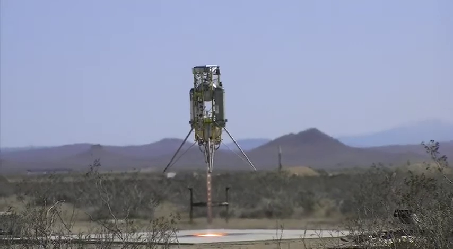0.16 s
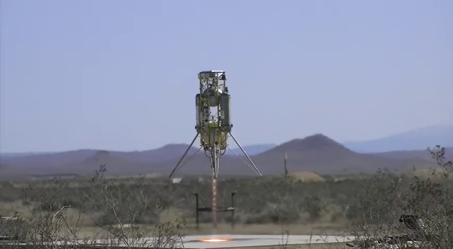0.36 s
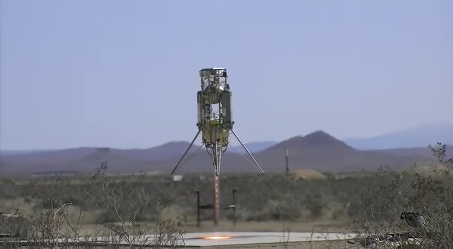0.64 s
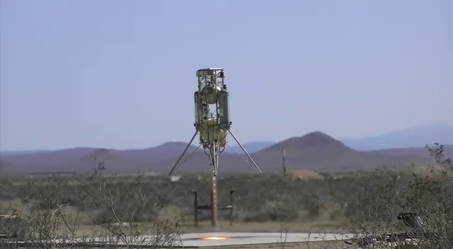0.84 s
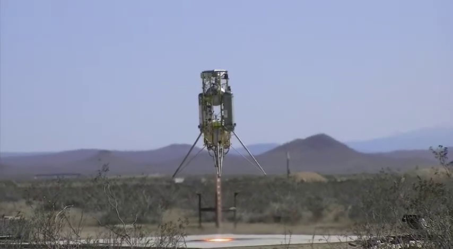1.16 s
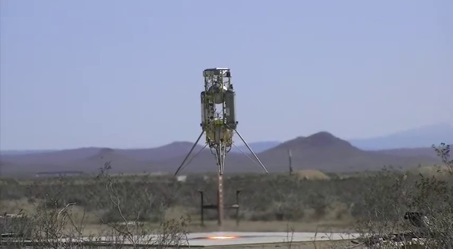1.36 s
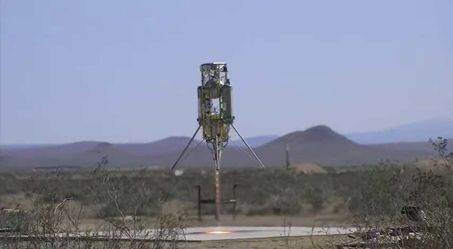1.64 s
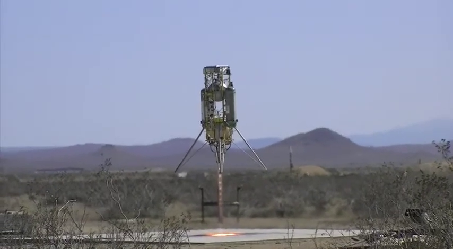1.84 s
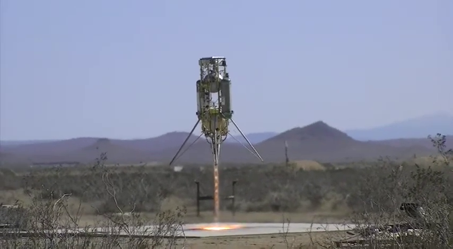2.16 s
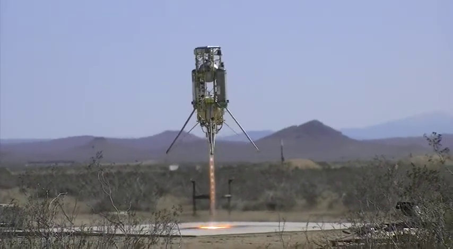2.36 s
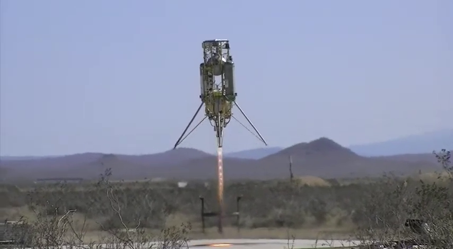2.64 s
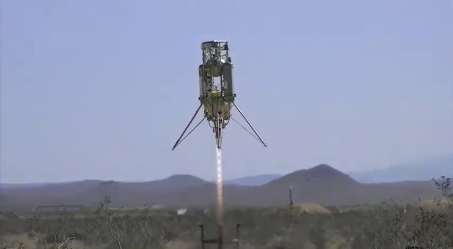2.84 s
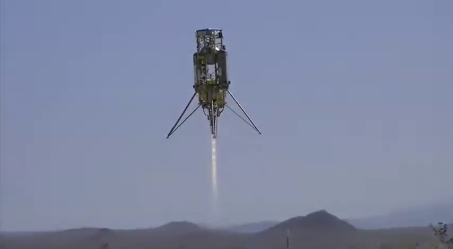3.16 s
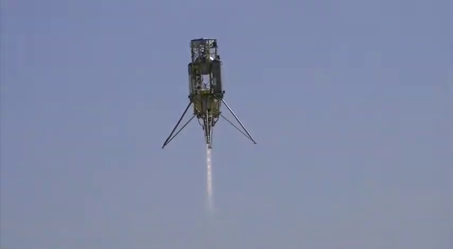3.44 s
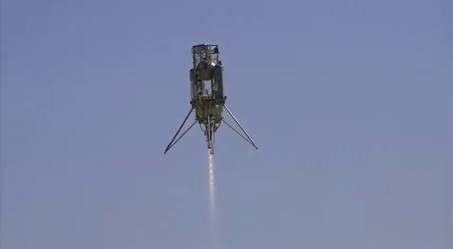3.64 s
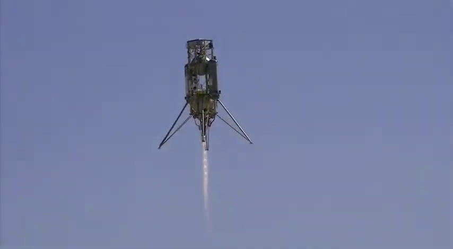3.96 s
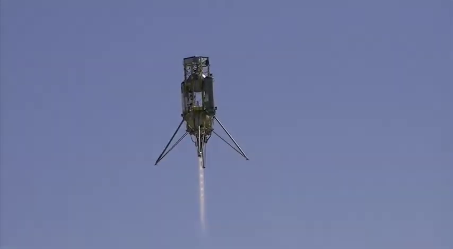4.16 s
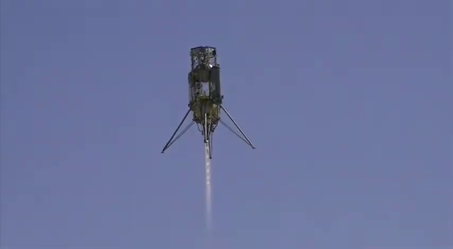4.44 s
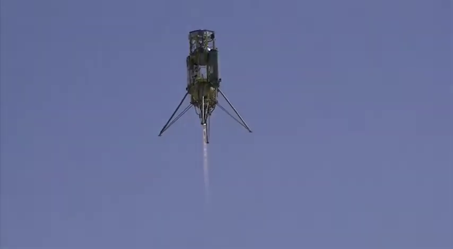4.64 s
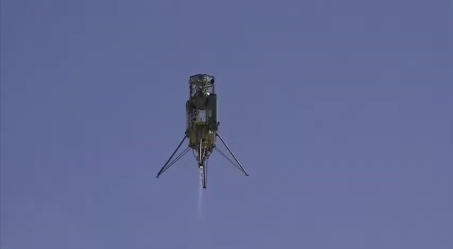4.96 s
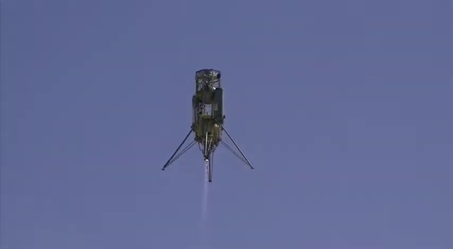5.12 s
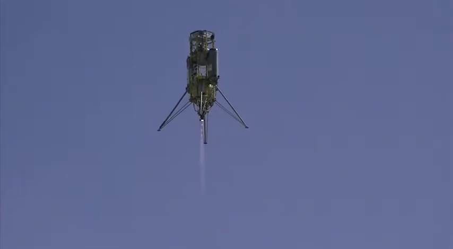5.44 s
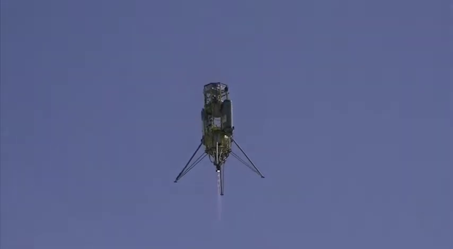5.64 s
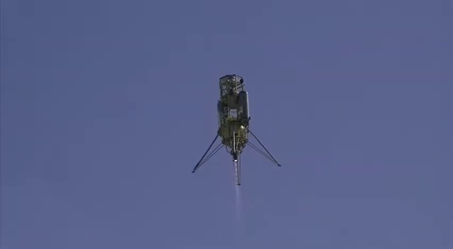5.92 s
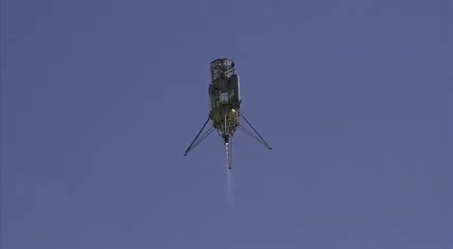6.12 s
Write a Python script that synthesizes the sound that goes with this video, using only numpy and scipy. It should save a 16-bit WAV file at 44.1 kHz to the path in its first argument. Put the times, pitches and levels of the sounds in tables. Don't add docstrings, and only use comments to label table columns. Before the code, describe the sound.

Open desert, heard from a distant camera microphone: continuous pressurised jet noise with no pauses. First a fairly thin, airy hiss with slow surges, dipping around two seconds; then liftoff brings a sudden swell into dense, distorted roaring with crackling sizzle. Ground echo makes a hollow whooshing tone sweep downward as height grows. The sound finally deepens and dulls, with an unsteady low drone around the pitch of a low hum.

```python
import sys
import numpy as np
from scipy import signal
from scipy.io import wavfile
from scipy.ndimage import uniform_filter1d

SR = 44100
rng = np.random.default_rng(int(sys.argv[2]) if len(sys.argv) > 2 else 0)


def wrap_up_sound(samples):
    columns = np.atleast_2d(samples).T
    tamed = np.clip(columns, -1, 1)
    steps = np.round(tamed * 32767).astype(np.int16)
    wavfile.write(sys.argv[1], SR, steps)


def gain_from_db(level_db):
    decades = np.asarray(level_db, float) / 20
    return 10 ** decades


N = 277389

# frequency in Hz, density in dB per Hz.
FINE_EDDIES = [(15, -91), (25, -91), (96, -19), (184, -15), (351, -16.5), (473, -15), (619, -11.5),
               (728, -9), (1150, 2), (1510, 2.5), (2320, 1), (6640, 0.5), (8240, -2.5), (12700, -24),
               (15700, -89)]


def read(points, hz):
    f, value = np.transpose(points)
    return np.interp(np.log(hz + 1), np.log(f + 1), value)


def evened(x):
    return x / np.sqrt(np.mean(abs(x) ** 2) + 1e-20)


def layer(shape_db, hz, low_hz, high_hz):
    shape = gain_from_db(shape_db)
    return shape[:, None] / np.linalg.norm(shape[(hz > low_hz) & (hz < high_hz)], axis=0)


def hiss(hz, hiss_db):
    return layer(read(FINE_EDDIES, hz), hz, 3200, 9100) * gain_from_db(hiss_db)


def roar(hz, t, roar_db):
    # frequency in Hz, density in dB per Hz.
    big_eddies = [(35, -63), (60, -50), (164, -42), (297, -10.5), (478, -11), (650, -1), (783, 2.5),
                  (977, -1.5), (1660, 0), (3500, -10), (4550, -17), (7700, -120)]
    octaves_down = 0.11 * np.clip(t - 5.1, 0, 1)
    shape = gain_from_db(read(big_eddies, hz[:, None] * 2 ** octaves_down))
    return shape / np.linalg.norm(shape[(hz > 500) & (hz < 1500)], axis=0) * gain_from_db(roar_db)


def rumble(hz, hiss_db, clear, lag_ms):
    # frequency in Hz, gain in dB.
    rumble_colour = [(25, -8), (80, -48), (150, 4), (230, 15), (350, 14), (600, 14), (1000, -54)]
    pad_db, clear_db = -36, 22.5
    rumble_hz, null_db = 234, -13
    rumble_db = hiss_db + pad_db + clear_db * clear
    rumble_db = rumble_db + null_db * np.sin(np.pi * rumble_hz * lag_ms / 1000) ** 2
    return layer(read(FINE_EDDIES, hz) + read(rumble_colour, hz), hz, 120, 260) * gain_from_db(rumble_db)


def sizzle(hz, plume_db):
    # frequency in Hz, density in dB per Hz.
    shock_fronts = [(4710, -65), (8000, -8), (14300, -16.5), (15700, -17.5)]
    level_db, at_plume_db, steepening = -49.5, -16, 3
    form_db, fade = -18.3, 4.5
    sizzle_db = level_db + steepening * (plume_db - at_plume_db)
    sizzle_db = sizzle_db + fade * np.minimum(plume_db - form_db, 0)
    return layer(read(shock_fronts, hz), hz, 13100, 15400) * gain_from_db(sizzle_db)


def surges_db(hz, t):
    # time in seconds, half length in seconds, centre in Hz, height in dB.
    surges = [(.2, 0.51, 2400, 4.5), (0.52, .2, 690, 7.5), (1.82, 0.27, 370, 4.5), (2.353, .12, 2200, 3),
              (2.84, 0.37, 1100, 4.5), (2.8, .09, 1560, -4), (3.043, 0.091, 2300, 7), (2.6, 0.095, 1750, 5),
              (0.64, .12, 920, -7), (1.94, 0.11, 1100, -5), (3.055, 0.085, 1950, -6),
              (3.955, 0.12, 950, -4), (3.7, 0.12, 2050, 3), (3.66, 0.1, 220, 4), (4.9, .3, 140, -10),
              (4.333, 0.12, 790, 2.5), (4.66, .18, 1580, 2.5), (4.998, 0.18, 2100, 3),
              (5.753, .3, 2100, 1.5)]
    total_db = 0
    for s, half, f, db in surges:
        over_pitch = np.exp(-(np.log2(hz / f + 1e-9) / 0.42) ** 2)
        over_time = np.exp(-((t - s) / half) ** 2)
        total_db = total_db + db * np.outer(over_pitch, over_time)
    return total_db


def ground_comb(hz, lag_ms, patches):
    # frequency in Hz, reflected share.
    mirror = [(200, .5), (800, 1.05), (1700, .95), (2500, .55), (3500, .25), (6000, .05)]
    # centre in Hz, width in Hz, depth in dB.
    grazing = [(499, 68, -9.5), (1200, 134, -6)]
    strength = np.interp(lag_ms, (.43, 1.15), (.15, .56))
    blur = np.interp(lag_ms, (1.3, 2.3), (1.4, 1))
    share = read(mirror, np.outer(hz, blur)) * strength
    echo = np.clip(share * (1 + .3 * patches[::-1]), 0, 1)
    delayed = echo * np.exp(-2j * np.pi * hz[:, None] * lag_ms / 1000)
    comb = (1 + delayed) / np.sqrt(1 + echo ** 2)
    dips_db = sum(db * np.exp(-((hz - f) / width) ** 2) for f, width, db in grazing)
    return comb * gain_from_db(np.outer(dips_db, np.clip(1.5 - 0.85 * lag_ms, 0, 1)))


def plume():
    # time in seconds, hiss in dB, how far the camera lies in the plume's aft cone (0-1).
    flight = [(0, -16.5, 0), (.35, -16.5, 0), (.95, -19.5, 0), (1.7, -21, 0.1), (2.05, -22, 0.17),
              (2.5, -19, 0.03), (2.63, -18.5, 0.04), (2.72, -15, 0.06), (3.15, -13, 0.39), (3.4, -15, 0.67),
              (3.7, -14.5, 0.56), (4.0, -16, 0.71), (4.3, -15.5, 0.64), (4.65, -16.5, 0.83),
              (5.0, -16.5, .8), (5.35, -15.5, 0.68), (5.62, -21, 0.96), (6.29, -18.5, 0.87)]
    # time in seconds, lag in ms.
    echo_lag = [(2.85, .43), (3.2, .58), (3.88, .66), (4.08, 1.14), (4.33, 1.26), (5.1, 2.49), (5.5, 3.0),
                (5.9, 3.43), (6.29, 3.72)]
    hop = 512
    hz, t = np.fft.rfftfreq(4 * hop, 1 / SR), np.arange(N // hop + 5) * hop / SR
    s, *columns = np.transpose(flight)
    hiss_db, aft = (np.interp(t, s, c) for c in columns)
    lag_ms = np.interp(t, *np.transpose(echo_lag))
    clear = np.clip(aft / .65, 0, 1)
    roar_db = hiss_db - 14 + 22 * aft
    plume_db = 10 * np.log10(gain_from_db(2 * hiss_db) + gain_from_db(2 * roar_db))

    power = hiss(hz, hiss_db) ** 2 + roar(hz, t, roar_db) ** 2
    power += rumble(hz, hiss_db, clear, lag_ms) ** 2
    power += sizzle(hz, plume_db) ** 2

    a, b, patches, gusts = rng.standard_normal((len(t), len(hz), 4)).T
    patches = evened(uniform_filter1d(uniform_filter1d(patches, size=40, axis=0), size=8, axis=1))
    gusts = evened(uniform_filter1d(gusts[0], size=3)) * np.clip(hz / 5000, 0, 1)[:, None]
    swing_db = surges_db(hz, t) + 0.77 * patches + 0.6 * gusts
    z = (a + 1j * b) * np.sqrt(power) * ground_comb(hz, lag_ms, patches) * gain_from_db(swing_db)
    return signal.istft(z, nperseg=4 * hop, noverlap=3 * hop)[1][:N] * 1.313


def hum():
    # time in seconds, pitch in Hz, level in dB.
    chamber_mode = [
        (4.85, 314, -33),
        (5.2, 298, -35.5),
        (5.34, 286.3, -21.5),
        (5.55, 280.5, -18.5),
        (5.799, 282, -31),
        (5.97, 281.5, -22.5),
        (6.04, 290.5, -25),
        (6.1, 268.8, -19),
        (6.29, 280, -26),
    ]
    s, hz, db = np.transpose(chamber_mode)
    t = np.arange(N) / SR
    noise = rng.standard_normal((2, N))
    a, b = (evened(uniform_filter1d(uniform_filter1d(v, size=900), size=900)) for v in noise)
    turn = np.exp(2j * np.pi * np.cumsum(np.interp(t, s, hz)) / SR)
    fade = np.clip((t - s[0]) / 0.12, 0, 1)
    tone = evened((turn * (1 + 0.36 * (a + 1j * b))).real)
    return tone * gain_from_db(np.interp(t, s, db)) * fade


def thinned_spectrum(x):
    # time in seconds, low edge in Hz, high edge in Hz.
    split_bands = [(0.251, 9646, 10938), (0.39, 4220, 6890), (2.898, 8268, 9646), (3.014, 4134, 5254),
                   (3.014, 6890, 8268), (3.154, 12489, 13695), (3.386, 4220, 5684), (3.386, 7579, 11025),
                   (3.618, 4220, 5254), (3.618, 7579, 8957), (3.78, 8268, 9646), (4.059, 10335, 11714),
                   (4.082, 4651, 6890), (4.641, 11111, 12316)]
    # frequency in Hz, level in dB.
    faint_lines = [(8000, -100), (11000, -79.5), (12800, -75), (13800, -71), (16000, -70)]
    # frequency in Hz, threshold in dB.
    masked_lines = [(3000, -70), (6000, -20), (10000, -10), (13000, -6), (14500, -1), (16000, 3)]
    size, lead = 2048, 196
    window = np.sqrt(signal.windows.hann(size, sym=False))
    hz, t, z = signal.stft(np.pad(x, (lead, 0)), SR, window, size, size // 2)
    band = np.arange(len(hz)) // 16
    band_rms = np.sqrt(uniform_filter1d(abs(z) ** 2, size=24, axis=0))
    relative = band_rms * gain_from_db(read(masked_lines, hz))[:, None]
    threshold = np.maximum(gain_from_db(read(faint_lines, hz))[:, None], relative)
    threshold = threshold * gain_from_db(3.6 * rng.standard_normal((len(t), band[-1] + 1)).T[band])
    threshold = threshold * gain_from_db(1.6 * rng.standard_normal(len(t)))
    z = z * (abs(z) > threshold)

    filled = 0
    for s, low, high in split_bands:
        near = abs(t - lead / SR - s) < size / 4 / SR
        filled = filled + np.outer((hz > low) & (hz < high), near)
    scrambled = z * np.exp(2j * np.pi * rng.random(z.shape[::-1]).T)
    both = np.array([z, gain_from_db(-1.5) * filled * scrambled])
    mid, side = signal.istft(both, SR, window, size, size // 2)[1][:, lead:lead + N]
    return np.array([mid + side, mid - side])


def scene():
    return np.tile(plume() + hum(), (2, 1))


def band_limit(x):
    return signal.sosfilt(signal.butter(12, 15890, fs=SR, output="sos"), x)


def record(dry):
    ceiling = .73
    x = ceiling * np.tanh(gain_from_db(-1.0) * dry[0] / ceiling)
    x = signal.lfilter(*signal.butter(1, 90, "high", fs=SR), x)
    x = signal.oaconvolve(x, signal.firwin(801, 15800, window=("kaiser", 10), fs=SR), "same")
    mix = thinned_spectrum(x)
    return band_limit(mix)


dry = scene()
out = record(dry)
wrap_up_sound(out)
```